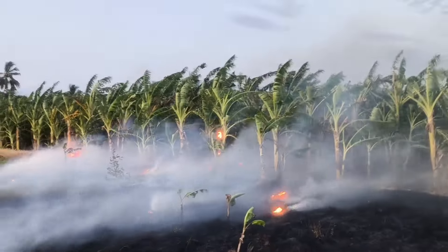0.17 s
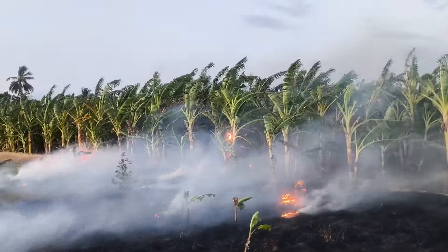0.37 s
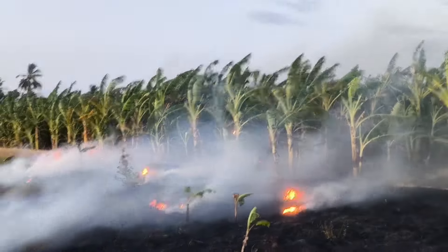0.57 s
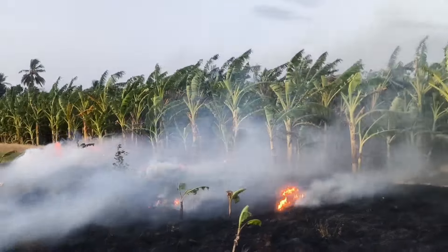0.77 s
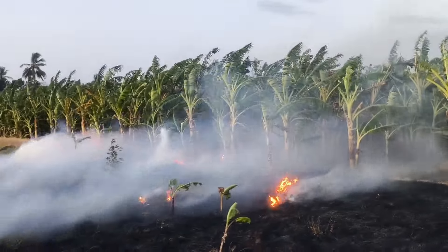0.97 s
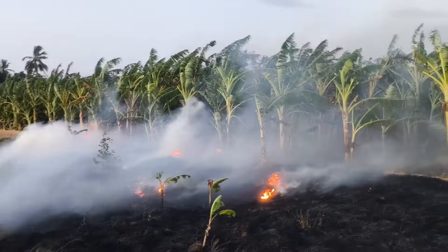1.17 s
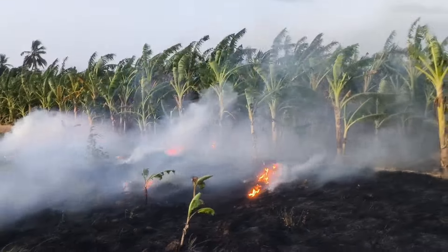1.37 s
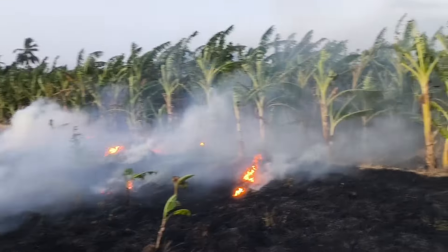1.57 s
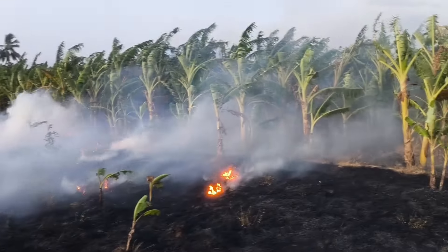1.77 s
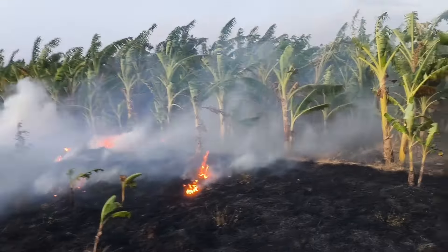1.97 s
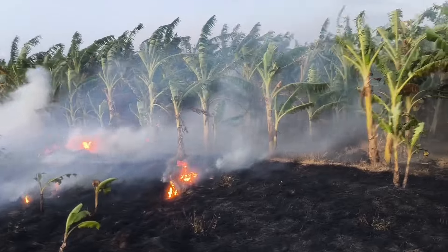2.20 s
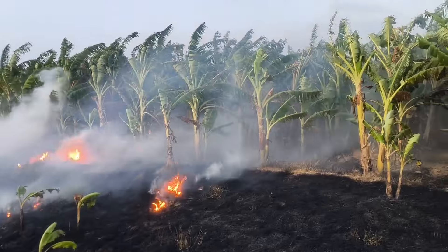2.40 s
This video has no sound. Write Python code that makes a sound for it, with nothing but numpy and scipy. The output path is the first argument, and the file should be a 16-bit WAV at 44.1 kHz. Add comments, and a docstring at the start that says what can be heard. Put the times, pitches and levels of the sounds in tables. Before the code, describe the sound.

Burning dry grass and stalks crackle close to a handheld stereo microphone outdoors; wind thuds at first, eases while snaps thicken, then returns hard around the loudest crack, after which the fire sounds slightly quieter.

```python
"""Dry grass fire in an open field

Stems snap close by, modelled as decaying noise bursts with a reflection; countless crackles and hiss merge
into a sizzle over flames of flickering coloured noise, and two sappy stalks burst with gritty jets of steam.
Saturating low noise buffets the microphone, mostly its left port. A limiter sensing the treble ducks both
channels after the loudest snap and recovers slowly."""
import sys
import numpy as np
from scipy import signal
from scipy.fft import rfft, irfft, next_fast_len
from scipy.io import wavfile
from scipy.ndimage import uniform_filter1d, minimum_filter1d

SR = 44100
rng = np.random.default_rng(int(sys.argv[2]) if len(sys.argv) > 2 else 0)


def digitize_waveform(pressure):
    """Quantize a signal to 16-bit integers and store it at the path in sys.argv[1].

    Rows of a 2-D input are taken as channels; values are limited to [-1, 1].
    """
    field = np.atleast_2d(pressure).T
    bounded = np.clip(field, -1, 1)
    quanta = np.round(bounded * 32767).astype(np.int16)
    wavfile.write(sys.argv[1], SR, quanta)


N = 107559  # length in samples

# Filter tables give relative gains; all levels precede the colouring by the ports.
# Flame roar: (t/s, level/dB)
ROAR_LEVELS = [(1.5, -42.5), (1.7, -38.5), (2.44, -46)]
# Filter for the roar: (f/Hz, level/dB)
ROAR_SPECTRUM = [(25, -40), (60, -5), (120, -0.5), (220, 0.5), (340, 3.5), (500, 0.5), (900, -7),
                 (1500, -11.5), (8000, -16), (15000, -24.5)]
# Rush of the flames flaring to the right, before panning: (t/s, level/dB)
RUSH_LEVELS = [(0, -35.5), (.1, -39.5), (.33, -35), (.6, -41), (.82, -38.5), (1.15, -41.5), (1.54, -38.5),
               (1.62, -34.5), (2.15, -40.5), (2.44, -37.5)]
# Filter for the rush: (f/Hz, level/dB)
RUSH_SPECTRUM = [(400, -13), (900, -6.5), (1450, 5), (2200, 2.5), (3200, -3), (7000, -4.5), (15000, -16)]
# Sizzle of small crackles: (t/s, level/dB)
SIZZLE_LEVELS = [(.08, -44), (.3, -41), (.6, -35), (.85, -34.5), (1.13, -35), (1.24, -36.5), (1.55, -37),
                 (1.7, -39), (1.95, -35.5), (2.44, -42)]
# Filter for the sizzle: (f/Hz, level/dB)
SIZZLE_SPECTRUM = [(500, -11), (1500, 3), (3000, 0), (6000, -0.5), (11000, -3), (15000, 1)]
# Puffs of wind on the left port, before WIND_DB: (centre t/s, level/dB, Gaussian width of the power/s)
PUFFS = [(.005, -26.5, 0.0064), (0.043, -23.5, 0.0078), (0.199, -21, 0.017), (0.257, -21.5, 0.006),
         (0.283, -18.5, 0.0046), (0.378, -20.5, 0.013), (0.413, -20.5, 0.0085), (0.435, -12, 0.0043),
         (.475, -24.5, 0.011), (.55, -31, 0.02), (0.779, -32, 0.023), (0.881, -27.5, 0.0081),
         (0.983, -33, 0.0093), (1.25, -34, 0.02), (1.379, -28.5, 0.015), (1.563, -26.5, 0.0046),
         (1.619, -25, 0.0043), (1.687, -23.5, 0.006), (1.734, -28.5, 0.013), (1.81, -32, 0.024),
         (1.909, -27, 0.011), (1.948, -24.5, 0.0042), (2.012, -15, 0.005), (2.037, -9.5, 0.0138),
         (2.089, -13, 0.0042), (2.107, -18, 0.015), (2.144, -18.5, 0.0054), (2.185, -19.5, 0.0056),
         (2.212, -21.5, 0.004), (2.244, -21, 0.011), (2.312, -14, 0.0054), (2.334, -13.5, 0.0061),
         (2.352, -18.5, 0.0052), (2.389, -22.5, 0.017)]
# Light breeze between the puffs, with one lull, before WIND_DB: (t/s, level/dB)
BREEZE_LEVELS = [(.85, -42.5), (1.1, -68), (1.3, -43)]
# Wind on the sheltered right port, before WIND_DB: (t/s, level/dB)
RIGHT_WIND_LEVELS = [(.27, -66), (.4, -34), (.44, -44), (.48, -34), (.57, -35), (.65, -37), (.7, -73)]
# Filter for eddies in gentle wind: (f/Hz, level/dB)
WIND_SPECTRUM = [(20, -53), (45, -43), (65, -1.5), (90, 2), (140, 4), (200, -10), (300, -16.5),
                 (500, -37.5), (4000, -80)]
# Filter for eddies in hard gusts: (f/Hz, level/dB)
GUST_SPECTRUM = [(20, -41), (45, -22), (70, -9.5), (130, 3), (220, 2), (340, -6), (480, -17), (700, -36.5),
                 (1200, -46.5), (4000, -69)]
# Snapping stems, energy before SNAP_DB: (t/s, energy level/dB, tilt/dB per octave)
SNAPS = [(0.0235, -2.5, -5), (0.1406, -4.5, -4), (.153, -5, -5), (0.25, -1, 6), (0.4012, -1, -8),
         (.446, -4, -7), (0.4715, -2.5, -6), (.561, -8, 0), (0.5795, -0.5, 1.5), (.634, 1, 5),
         (0.7228, -3.5, -3), (0.758, -3, -1), (.786, -5, -7), (0.8084, 1, -4), (.822, 1, -6),
         (0.8432, 5, 0.5), (0.8674, 2, -3), (.932, 8.5, 5.5), (0.94, -7, 2), (0.9774, 6.5, -0.5),
         (1.0008, 4, -5), (1.016, 3.5, 1), (1.079, -0.5, 3.5), (1.1018, -4, -1), (1.126, -5, 5),
         (1.162, -5, 0), (1.194, 3, 6.5), (1.211, -8, 11), (1.2195, -6, 6), (1.2663, 2, 6.5),
         (1.2718, 1, 8), (1.2974, 3.5, 4), (1.4253, -4.5, 2), (1.4544, -5.5, -7), (1.511, -2, -3),
         (1.5146, -2.5, 5), (1.537, -4, -5), (1.5422, -3.5, -4), (1.5938, 3, -5), (1.603, 5, -5),
         (1.611, -5, 6), (1.645, -1, -4), (1.6566, 5.5, 3), (1.731, 2, 4.5), (1.75, 2, -1),
         (1.7752, 5.5, 11), (1.7805, 0, -1), (1.7916, -4, 1), (1.836, -3, 1), (1.9818, 0, 9),
         (2.1035, 1, 1), (2.126, 2.5, -1), (2.159, -5, 3), (2.2043, 2.5, -1), (2.3947, 8.5, 3.5)]
# Filter for a snap before its tilt: (f/Hz, level/dB)
SNAP_SPECTRUM = [(300, -28.5), (1000, -19), (2000, -29), (4000, -8), (6000, -1), (10000, -0.5), (15000, 0)]
# Stalks venting steam, before panning: (t/s, level/dB, rise/s, decay/s, tilt/dB per octave)
SPITS = [(0.148, -23.5, 0.016, 0.031, -4), (1.452, -21, 0.0034, 0.027, 1)]
# Filter for the steam before its tilt: (f/Hz, level/dB)
SPIT_SPECTRUM = [(300, -28), (800, -5), (1200, -1.5), (2000, 6), (4000, 0.5), (7000, -1), (11000, -6.5),
                 (15000, -31)]
# Single hard eddies on the left port: (t/s, peak level/dB)
SLAPS = [(0.4286, -3), (2.0061, -4.5), (2.0773, -4), (2.369, 0)]
# Colour of the left port: (f/Hz, level/dB)
LEFT_PORT = [(500, 0), (1000, -3), (1800, -8.5), (3000, -3), (5000, 0), (6500, -4), (7800, -3.5),
             (9300, 5.5), (10700, 7.5), (13000, 3), (15000, 1)]
# Colour of the right port: (f/Hz, level/dB)
RIGHT_PORT = [(500, 0.5), (1000, -0.5), (1500, -2), (3100, -1.5), (5800, 1), (6600, 6), (7400, 4.5),
              (8800, 3), (10300, -6), (11300, 6), (15000, 0.5)]

TILT_PIVOT_HZ = 7000  # a tilt leaves the gain here unchanged
RUSH_PAN_DB, FLICKER_DB, FLICKERS_PER_S = -1.5, 1.57, 18

CRACKLES_PER_S, CRACKLE_SPREAD_DB, CRACKLE_RANGE_DB = 1700, 7.5, 27
CRACKLE_TAIL_DB, CRACKLE_TAIL_S, HISS_DB = 11, 0.0034, -2.5  # levels relative to the direct crackles
RIGHT_LAG_S, RIGHT_DB = 0.0004, -8  # right port relative to left, for crackles and snaps

GUST_DB, GUST_RANGE_DB = -20, 4  # midpoint and width of the change from wind to gust
WIND_DB, PORT_MAX, PORT_TOP_HZ = 1.5, 0.68, 724  # PORT_MAX is the saturation pressure
SLAP_TILT = 2.6  # dB per octave

# Thin blades: top energy over the sizzle, range below it, mean tilt in dB per octave
TICKS_PER_S, TICK_OVER_SIZZLE_DB, TICK_RANGE_DB, TICK_TILT = 85, 27.5, 9, 2.2

NEAR_SNAP = (2.0461, 15.5, 3)  # the loudest snap; columns as in SNAPS
SNAP_DB, SNAP_DECAY_S = 0.5, 0.0002
SPLINTER_DB, SPLINTER_DECAY_S = -14, 0.0013  # fibres tear just after the break
ONSET_DB, ONSET_S, LEAD_S = -12, 0.001, 0.005  # short noise fading in to soften each snap's attack
ECHO_S, ECHO_SPREAD, ECHO_WIDTH_S = 0.0014, 0.2, 0.00035  # mean delay, relative spread, Gaussian width
ECHO_LEFT_DB, ECHO_RIGHT_DB = -12, -3
FIELD_DB, FIELD_DECAY_S = -18, 0.008

SPIT_PAN_DB, SPIT_GRIT_DB, SPIT_GRAINS_PER_S = -3, 3, 1800

LOW_CUT_HZ, TOP_HZ = 53.4, 15700
LIMIT_DB, SENSE_ABOVE_HZ, RELEASE_DB_PER_S = -7.5, 1500, 12.5


def undb(db):
    """Amplitude ratio: ten to the power of the level over 20."""
    return 10 ** (np.asarray(db) / 20)


def unit(x):
    """Normalisation to an rms value of 1."""
    return x / np.sqrt(np.mean(x ** 2))


def curve(rows):
    """Linear interpolation of (t/s, value) rows."""
    return np.interp(np.arange(N) / SR, *np.array(rows).T)


def pan(db):
    """Level difference: left and right gains sharing it equally."""
    return undb(np.array([[db], [-db]]) / 2)


def colour(x, points, tilt=0):
    """Minimum-phase filtering: the folded cepstrum turns a gain curve into a causal response."""
    size = 2 * next_fast_len(x.shape[-1])
    octave = np.log2(np.maximum(np.arange(size // 2 + 1) * SR / size, 1))
    hz, db = np.array(points).T
    # the tilt is held constant below the first point
    tilt_octaves = np.maximum(octave, np.log2(hz[0])) - np.log2(TILT_PIVOT_HZ)
    gain_db = np.interp(octave, np.log2(hz), db) + tilt * tilt_octaves
    cepstrum = irfft(np.log(undb(gain_db)))
    fold = np.r_[1, np.full(size // 2 - 1, 2), 1, np.zeros(size // 2 - 1)]
    response = np.exp(rfft(cepstrum * fold))
    return irfft(rfft(x, size) * response)[..., :x.shape[-1]]


def walk(rate):
    """Band-limited fluctuation: random values at a given rate, smoothed and scaled to rms 1."""
    hold = max(int(SR / rate), 1)
    steps = np.repeat(rng.standard_normal(N // hold + 1), hold)
    return unit(uniform_filter1d(steps, hold)[:N])


def burst(envelope):
    """Transient noise: a random signal under an envelope, with energy 1."""
    x = envelope * rng.standard_normal(len(envelope))
    return x / np.sqrt(np.sum(x ** 2))


def flames(levels, spectrum, shared):
    """Turbulent combustion noise: partly coherent noise at both ports, with a flickering level."""
    common = np.sqrt(shared) * rng.standard_normal(N)
    separate = np.sqrt(1 - shared) * rng.standard_normal((2, N))
    level_db = curve(levels) + FLICKER_DB * walk(FLICKERS_PER_S)
    return unit(colour(common + separate, spectrum)) * undb(level_db)


def sizzle(size=512):
    """Random impulse process: crackles of unequal size, each briefly smeared, over the farthest ones' hiss."""
    happens = rng.random(N) < CRACKLES_PER_S / SR
    strength_db = np.minimum(CRACKLE_SPREAD_DB * rng.exponential(1, N), CRACKLE_RANGE_DB)
    clicks = happens * rng.choice([-1, 1], N) * undb(strength_db)
    right_clicks = undb(RIGHT_DB) * np.roll(clicks, int(RIGHT_LAG_S * SR))
    direct = unit(np.array([clicks, right_clicks]))
    # power decays twice as fast as amplitude
    tail_power = np.exp(-2 * np.arange(size) / SR / CRACKLE_TAIL_S)
    tail_envelope = unit(np.sqrt(np.convolve(clicks ** 2, tail_power)[:N]))
    smear = tail_envelope * rng.standard_normal((2, N))
    hiss = rng.standard_normal((2, N))
    mix = direct + undb(CRACKLE_TAIL_DB) * smear + undb(HISS_DB) * hiss
    return unit(colour(mix, SIZZLE_SPECTRUM)) * undb(curve(SIZZLE_LEVELS))


def puffs():
    """Power addition: Gaussian swells of wind over a light breeze, returned as a level in dB."""
    t = np.arange(N) / SR
    power = undb(curve(BREEZE_LEVELS)) ** 2
    for centre, db, width in PUFFS:
        power = power + undb(db) ** 2 * np.exp(-0.5 * ((t - centre) / width) ** 2)
    return 10 * np.log10(power)


def wind(db):
    """Turbulent pressure at a saturating port: the harder the gust, the smaller and quicker its eddies."""
    eddies = rng.standard_normal(N)
    hard = 0.5 + 0.5 * np.tanh((db - GUST_DB) / GUST_RANGE_DB)
    gentle_push = unit(colour(eddies, WIND_SPECTRUM))
    hard_push = unit(colour(eddies, GUST_SPECTRUM))
    push = (1 - hard) * gentle_push + hard * hard_push
    # dividing by the short-term rms lets the level curve alone set the loudness
    power = uniform_filter1d(np.abs(signal.hilbert(push)) ** 2 / 2, size=600)
    push = push / np.sqrt(power)
    pressure = PORT_MAX * np.tanh(push * undb(db + WIND_DB) / PORT_MAX)
    return signal.sosfilt(signal.butter(2, PORT_TOP_HZ, fs=SR, output="sos"), pressure)


def ticks():
    """Uniformly random event times: thin blades snap, louder where the sizzle is; columns as in SNAPS."""
    sizzle_db = curve(SIZZLE_LEVELS)
    rows = []
    for when, far, thin in rng.random((int(TICKS_PER_S * N / SR), 3)):
        db = sizzle_db[int(when * N)] + TICK_OVER_SIZZLE_DB - TICK_RANGE_DB * np.sqrt(far)
        rows.append((when * N / SR, db, 2 * TICK_TILT * thin))
    return rows


def fade(age, decay):
    """Exponential decay: a noise burst of energy 1 that begins at age zero."""
    return burst((age >= 0) * np.exp(-np.abs(age) / decay))


def snaps(rows, size=1536):
    """Brittle fracture: a softened onset, crack and splintering, a close reflection and the field's decay."""
    out = np.zeros((2, N + size))
    t = np.arange(size) / SR - LEAD_S
    for start, db, tilt in rows:
        crack = fade(t, SNAP_DECAY_S)
        crack = crack + undb(SPLINTER_DB) * fade(t, SPLINTER_DECAY_S)
        crack = crack + undb(ONSET_DB) * fade(-t, ONSET_S)  # reversed time: a soft onset
        delay = ECHO_S * (1 + ECHO_SPREAD * rng.uniform(-0.96, 1))
        echo = np.exp(-0.5 * ((t - delay) / ECHO_WIDTH_S) ** 2)
        left = crack + undb(ECHO_LEFT_DB) * burst(echo)
        right = undb(RIGHT_DB) * np.roll(crack, int(RIGHT_LAG_S * SR))
        right = right + undb(ECHO_RIGHT_DB) * burst(echo)
        field = np.array([fade(t, FIELD_DECAY_S) for _ in range(2)])
        snap = colour(np.array([left, right]) + undb(FIELD_DB) * field, SNAP_SPECTRUM, tilt)
        snap = snap / np.sqrt(np.sum(snap ** 2))
        first = max(int((start - LEAD_S) * SR), 0)
        out[:, first:first + size] += undb(db + SNAP_DB) * snap
    return out[:, :N]


def spits():
    """Jet noise: a stalk splits and its steam, roughened by rapid level changes, dies away."""
    out = np.zeros((2, N))
    for start, db, rise, decay, tilt in SPITS:
        age = np.maximum(np.arange(N) / SR - start, 0)
        envelope = np.minimum(age / rise, 1) * np.exp(-np.maximum(age - rise, 0) / decay)
        grit = undb(SPIT_GRIT_DB * walk(SPIT_GRAINS_PER_S))
        jet = grit * rng.standard_normal((2, N))
        out += undb(db) * envelope * unit(colour(jet, SPIT_SPECTRUM, tilt))
    return out * pan(SPIT_PAN_DB)


def slaps():
    """Impulse response: a single hard eddy gives one push of pressure and its rebound."""
    hits = np.zeros(N)
    for start, db in SLAPS:
        hits[int(start * SR)] = undb(db)
    push = colour(np.r_[1, np.zeros(2047)], GUST_SPECTRUM, SLAP_TILT)
    return signal.fftconvolve(hits, push / np.max(np.abs(push)))[:N]


def scene():
    """Superposition: flames, sizzle, wind at each port, snaps and spits add linearly."""
    roar = flames(ROAR_LEVELS, ROAR_SPECTRUM, shared=0.76)
    rush = pan(RUSH_PAN_DB) * flames(RUSH_LEVELS, RUSH_SPECTRUM, shared=0.033)
    left_wind = wind(puffs()) + slaps()
    right_wind = wind(curve(RIGHT_WIND_LEVELS))
    buffets = np.array([left_wind, right_wind])
    stems = snaps([*SNAPS, NEAR_SNAP, *ticks()])
    return roar + rush + sizzle() + buffets + stems + spits()


def record(dry):
    """Linear filtering and gain control: ports colour, deep bass is cut, a limiter ducks, the top is cut."""
    x = np.array([colour(dry[0], LEFT_PORT), colour(dry[1], RIGHT_PORT)])
    x = signal.sosfilt(signal.butter(4, LOW_CUT_HZ, "high", fs=SR, output="sos"), x)
    sensed = signal.sosfilt(signal.butter(2, SENSE_ABOVE_HZ, "high", fs=SR, output="sos"), x)
    power = uniform_filter1d(np.sum(sensed ** 2, axis=0), size=110)
    over_db = 10 * np.log10(np.maximum(power / undb(LIMIT_DB) ** 2, 1))
    # a running maximum holds each excess while the gain recovers at a constant rate
    recovery = RELEASE_DB_PER_S * np.arange(N) / SR
    duck_db = recovery - np.maximum.accumulate(over_db + recovery)
    duck_db = uniform_filter1d(minimum_filter1d(duck_db, size=61), size=41)
    limited = np.clip(x * undb(duck_db), -1, 1)
    top = signal.ellip(10, 0.2, 80, TOP_HZ, fs=SR, output="sos")
    return signal.sosfilt(top, limited)


dry = scene()
out = record(dry)
digitize_waveform(out)
```